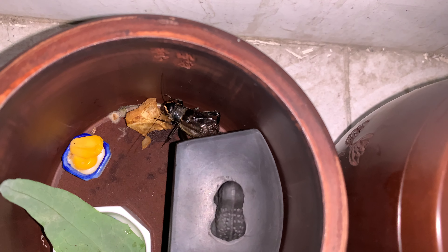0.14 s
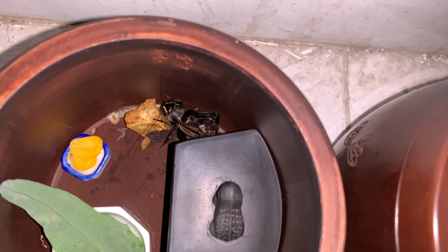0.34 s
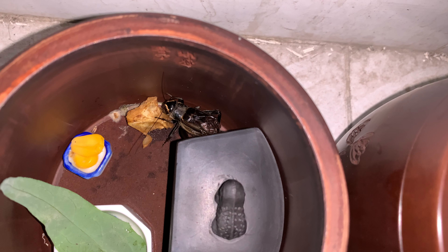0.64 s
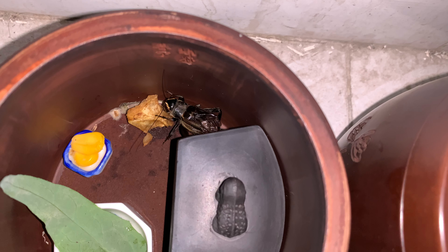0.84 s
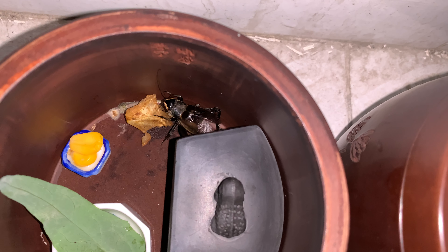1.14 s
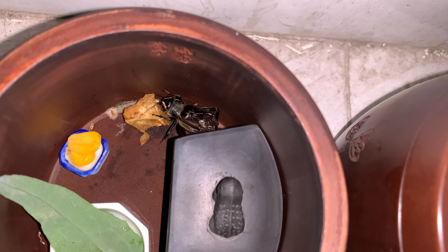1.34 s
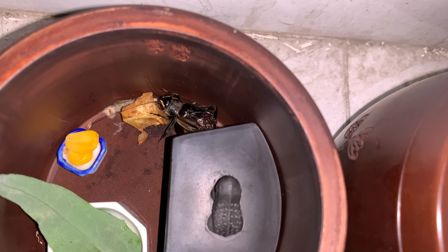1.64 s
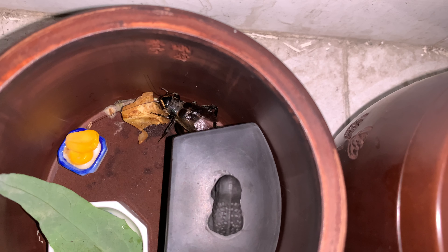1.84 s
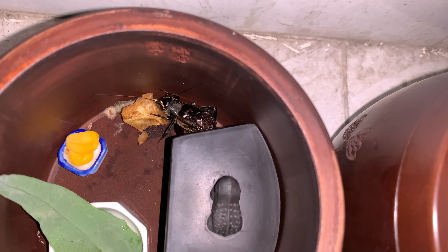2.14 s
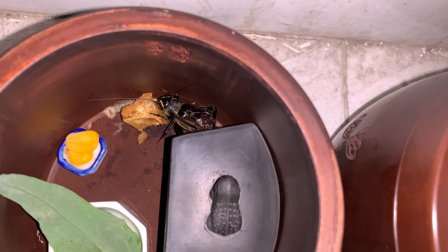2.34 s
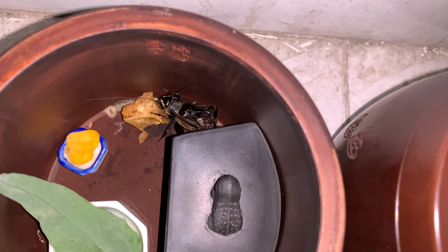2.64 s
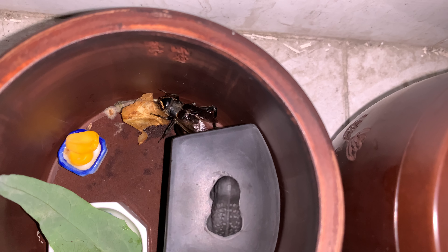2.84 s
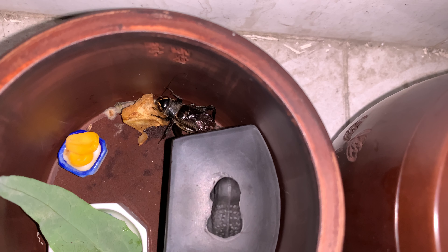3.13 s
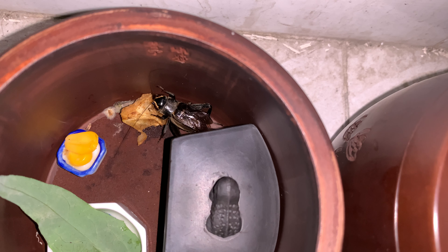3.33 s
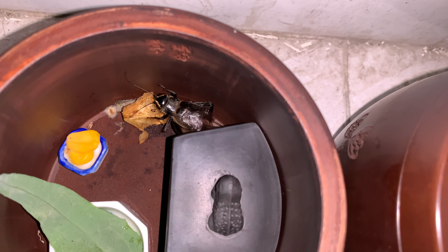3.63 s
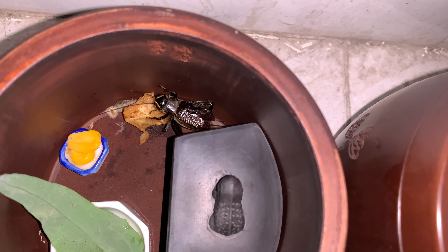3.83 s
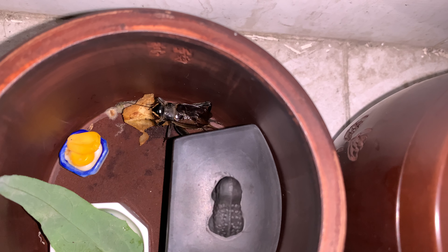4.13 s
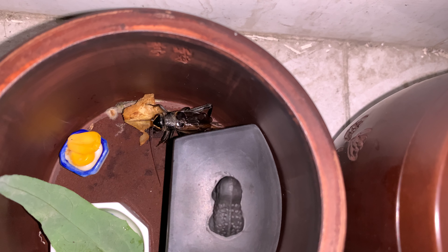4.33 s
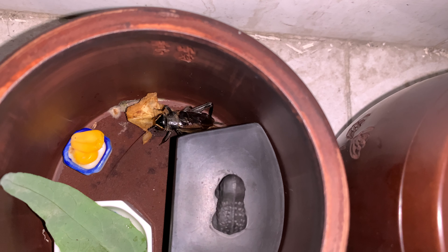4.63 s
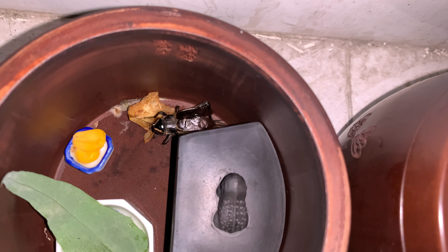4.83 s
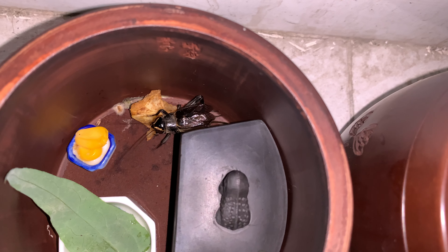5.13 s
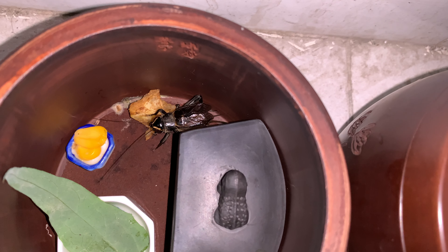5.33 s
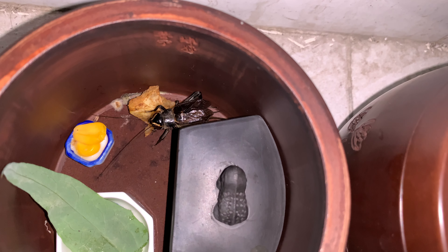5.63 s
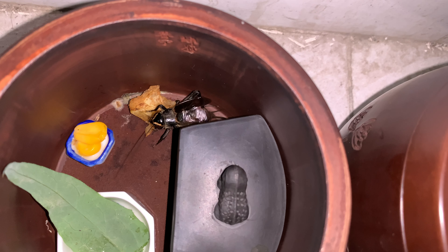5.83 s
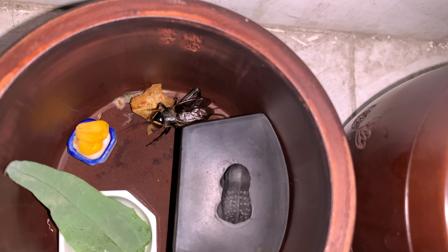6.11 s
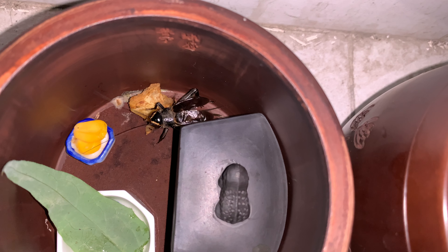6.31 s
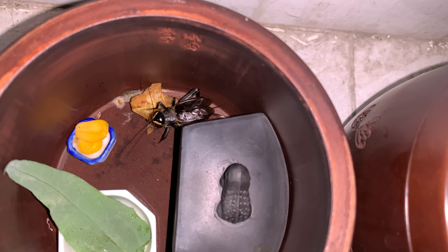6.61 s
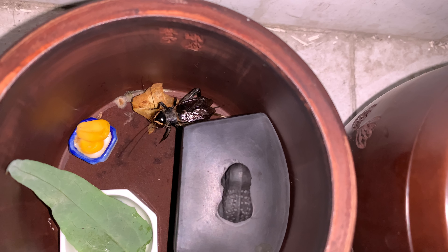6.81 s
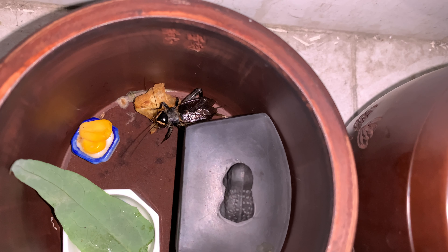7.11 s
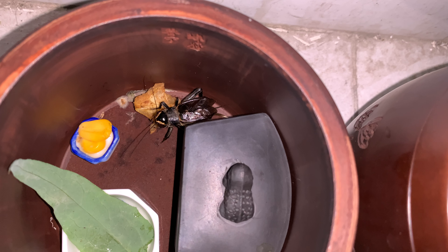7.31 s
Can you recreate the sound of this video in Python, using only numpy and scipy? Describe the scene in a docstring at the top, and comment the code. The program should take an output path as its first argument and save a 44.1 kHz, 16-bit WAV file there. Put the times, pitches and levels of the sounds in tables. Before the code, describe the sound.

A cricket sings close to the microphone inside a glazed pottery jar in a quiet tiled room. A somewhat softer five-stroke chirp begins almost at once, followed by faint fluttering double pulses from about 0.55 to 0.95 seconds. Loud, shrill chirps come at 1.1 and 1.9, each a fast run of grainy strokes gliding downward around 4 kHz and swelling at first. Another soft shivering bout runs from 2.2 to 2.5. Chirps return at 2.9 and 3.6; the latter is shorter, cut by a sharp scratch near 3.7. Quiet shivers follow from 3.9 to 4.3, then a relative pause. Loud chirps resume at 4.9, 5.8 and 6.4, with a small pulse near 6.1. Tiny foot scrapes are barely audible. The jar rings briefly, the room holds a bright tail, and low rumble, wavering hum and thin hiss remain to the end.

```python
"""In a quiet tiled room, a cricket sings inside a glazed pottery jar, close to the microphone.
Stridulation makes each loud chirp: in four to six wing strokes the file slows under the scraper,
so the tone glides down through the wing's resonance, with grainy friction noise around it.
Between the chirps the wings shiver in soft double pulses, snags scratch and feet scrape the clay.
The jar rings briefly and the room holds the shrill tone, over low rumble, a wavering hum and hiss."""
import sys
import numpy as np
from scipy import signal
from scipy.fft import rfft, irfft, next_fast_len
from scipy.io import wavfile
from scipy.ndimage import map_coordinates

SR = 44100
rng = np.random.default_rng(int(sys.argv[2]) if len(sys.argv) > 2 else 0)


def materialize(psi):
    """Save the field psi as 16-bit PCM at rate SR to the path in sys.argv[1].

    A 1-D psi becomes a single channel; in a 2-D psi each row is a channel.
    """
    bounded = np.clip(np.atleast_2d(psi).T, -1, 1)
    quanta = np.round(bounded * 32767).astype(np.int16)
    wavfile.write(sys.argv[1], SR, quanta)


N = 328986


def amp(db):
    """Logarithmic level: decibels become an amplitude ratio."""
    return 10 ** (np.asarray(db) / 20)


def unit(x):
    """Normalisation: the signal is scaled to an rms of 1."""
    return x / np.sqrt(np.mean(x ** 2) + 1e-20)


def along(points, hz):
    """Logarithmic frequency scale: (Hz, value) points are interpolated along it."""
    point_hz, values = np.transpose(points)
    return np.interp(np.log(hz + 1), np.log(point_hz + 1), values)


def columns(rows, at):
    """Linear interpolation: each column after the first is read at the given places."""
    place, *cols = np.transpose(rows)
    return [np.interp(at, place, col) for col in cols]


def wobble(rate, size):
    """Band-limited fluctuation: a smooth random curve with rate knots a second."""
    knots = rng.standard_normal(int(size * rate / SR) + 4)
    return map_coordinates(knots, [np.arange(size) * rate / SR])


def filtered(x, response):
    """Linear filtering: the spectrum is multiplied by a response of frequency."""
    m = next_fast_len(N + SR // 2)  # room for the filter to ring past the end
    hz = np.fft.rfftfreq(m, 1 / SR)
    return irfft(rfft(x, m) * response(hz), m)[..., :N]


def coloured(x, spectrum):
    """Spectral shaping: a (Hz, dB) curve leaves the power of white noise unchanged."""
    return filtered(x, lambda hz: unit(amp(along(spectrum, hz))))


def noise(spectrum, force=1):
    """Random excitation: friction or air noise of the given strength, coloured."""
    return coloured(force * rng.standard_normal(N), spectrum)


def add(track, s, sound):
    """Superposition: a sound is mixed into a track at s seconds."""
    part = track[max(0, round(s * SR)):][:len(sound)]
    part += sound[:len(part)]


# Wavering level of the hum. Each row: time in seconds, level in dB before a 2.5 dB cut.
HUM_LEVEL = [(0, -52.5), (1.2, -61.5), (2.4, -53), (2.95, -52.5), (3.15, -62.5), (5.0, -56), (5.7, -68.5),
             (7.4, -60)]


def hum():
    """Frequency modulation: a sine near 74 Hz drifts in pitch and follows a changing level."""
    t = np.arange(N) / SR
    hz = 74 + 1.2 * wobble(6, size=N)
    level = amp(columns(HUM_LEVEL, t)[0] - 2.5)
    return level * unit(np.sin(2 * np.pi * np.cumsum(hz) / SR))


# Colour of the rumble shared by both ports. Each row: frequency in Hz, relative density in dB per Hz.
AIR_SHARED = [(22, -30.5), (40, -13.5), (60, -1), (130, -1), (170, -8), (270, -10), (350, -16), (430, -15),
              (520, -24), (720, -21), (860, -28), (1280, -21), (1950, -27.5), (2600, -38.5), (4000, -69)]
# Colour of its unshared part. Each row: frequency in Hz, relative density in dB per Hz.
AIR_UNSHARED = [(35, -33.5), (70, -9), (260, -1.5), (450, -3), (700, -1), (930, -5.5), (1260, -6),
                (1900, -12.5), (2600, -17.5), (4500, -49.5)]
# Colour of the faint hiss. Each row: frequency in Hz, relative density in dB per Hz.
HISS_COLOUR = [(1500, -20.5), (2500, 1), (3800, -1.5), (4700, -14), (5400, -14.5), (7000, -14.5),
               (10000, -23.5), (16000, -26.5)]


def room_tone():
    """Partial coherence: shared and opposed noises make a wide rumble and hiss, with a central hum."""
    t = np.arange(N) / SR
    air = amp(-51.0 - 0.32 * t + 0.23 * wobble(3, size=N))  # the rumble eases slowly
    mid = air * noise(AIR_SHARED) + hum() + amp(-78.5) * noise(HISS_COLOUR)
    side = air * amp(-12.5) * noise(AIR_UNSHARED) + amp(-78) * noise(HISS_COLOUR)
    return np.array([mid + side, mid - side])


# Snags of the scraper on the file, as the wings are raised or in mid-stroke.
# Each row: start in seconds, level in dB, t60 in seconds.
SNAG_EVENTS = [(.040, -39, 0.036), (1.108, -39, 0.021), (1.218, -24, 0.038), (1.904, -37, 0.023),
               (2.002, -28, 0.037), (2.010, -30.5, .03), (2.897, -41.5, 0.056), (3.589, -34, .04),
               (3.728, -11.5, .02), (4.886, -49, 0.036), (4.901, -25, .028), (4.985, -24, 0.036),
               (4.993, -23, 0.034), (6.358, -44, 0.075)]
# Colour of a snag's scratch. Each row: frequency in Hz, relative density in dB per Hz.
SCRATCH_COLOUR = [(900, -39.5), (1900, -29), (2600, -37.5), (3700, -5.5), (4700, -1.5), (5600, -8.5),
                  (6400, 2), (7400, -12.5), (8500, -2.5), (9500, -7.5), (10400, 0.5), (11600, -2.5),
                  (12700, 0.5), (15500, -3.5)]
CATCH_S = .025  # t60 of the catch that opens a chirp


def snags():
    """Impulsive friction: skipped teeth make short, bright, crackly scratches; one opens each chirp."""
    force, t = np.zeros(N), np.arange(SR // 20) / SR
    catches = [(s, catch_db, CATCH_S) for s, *_, catch_db in CHIRP_EVENTS]
    for s, db, t60 in SNAG_EVENTS + catches:
        add(force, s, amp(db - 60 * t / t60))
    crackle = unit(amp(3.8 * wobble(2000, size=N)))
    return noise(SCRATCH_COLOUR, force * crackle)


def echoes(x, decay, colour, channels):
    """Exponential decay: in a diffuse tail each frequency has its own strength and dies at its own speed."""
    hz, t, z = signal.stft(rng.standard_normal((channels, SR)), SR, nperseg=256)
    fade = amp(-60 * t / along(decay, hz)[:, None]) * (t > 0)
    energy = np.sum(fade ** 2, axis=1, keepdims=True) * t[1] * SR
    fade *= amp(along(colour, hz))[:, None] / np.sqrt(energy)
    tail = signal.istft(z * fade, SR, nperseg=256)[1]
    return signal.fftconvolve(x[None], tail, axes=1)[:, :N]


# Decay of the jar. Each row: frequency in Hz, t60 in seconds.
JAR_DECAY = [(1900, .22), (4300, .06), (6400, 0.093), (10000, 0.037), (15000, .1)]
# Strength of the jar's ring. Each row: frequency in Hz, level in dB.
JAR_STRENGTH = [(1900, 6), (2600, -12), (3600, -12), (4300, -21), (5100, -7), (6400, -6), (8300, -22),
                (10400, -8), (12600, -26), (14000, -9)]


def jar_ring(cricket):
    """Cavity reverberation: the glazed jar answers with a brief diffuse ring."""
    return echoes(cricket, JAR_DECAY, JAR_STRENGTH, channels=1)[0]


# The jar's standing waves turn the phase between the two ports.
# Each row: frequency in Hz, lead of the left port in radians.
PORT_PHASE = [(100, -1.5), (3000, 1.75), (4000, 2), (4400, 2.5), (5340, 4), (6120, 6.5), (7410, 7),
              (7920, 8), (9650, 10), (10300, 11.5), (12700, 15), (13800, 16.5), (14600, 18), (16400, 19.5)]


def two_ports(jar):
    """Interaural-style phase difference: half the lead goes to the left port, half the lag to the right."""
    sign = np.array([[1], [-1]])
    return filtered(jar, lambda hz: np.exp(.5j * along(PORT_PHASE, hz) * sign))


# Decay of the room. Each row: frequency in Hz, t60 in seconds.
ROOM_DECAY = [(1000, 0.97), (4300, 0.64), (6500, 0.12), (13000, .33)]
# Strength of the room's tail. Each row: frequency in Hz, level in dB.
ROOM_STRENGTH = [(3950, -25.5), (4300, -28.5), (5000, -29), (8000, -40), (13000, -42)]


def room_tail(jar):
    """Room reverberation: the tiled room prolongs the shrill tone in two independent tails."""
    return echoes(jar, ROOM_DECAY, ROOM_STRENGTH, channels=2)


# How the wings radiate a tone and its overtones. Each row: frequency in Hz, relative gain in dB.
WING_RESPONSE = [(3800, -15), (3990, -8), (4090, -8.5), (4270, -2.2), (4340, 0), (4450, -6), (4700, -12),
                 (7700, -36), (8250, -24), (8900, -35), (11800, -36), (12450, -16), (12850, -14),
                 (13400, -32)]


def wing_tone(pitch, pressure_db, levels_db, steepness, jitter, flutter_db):
    """Resonance: one tooth strike a cycle; partials grow with pressure and swell near a wing resonance."""
    size = len(pitch)
    pitch = pitch * (1 + jitter * wobble(700, size=size))
    phase = 2 * np.pi * (np.cumsum(pitch) / SR + rng.random())
    tone = np.zeros(size)
    for k, (db, steep) in enumerate(zip(levels_db, steepness), 1):
        resonance_db = along(WING_RESPONSE, k * pitch)
        swell = amp(steep * pressure_db + resonance_db + flutter_db * wobble(380, size=size))
        tone += amp(db) * unit(swell * np.sin(k * phase))
    return tone * signal.windows.tukey(size, .1)


# Loud chirps. Each row: start in seconds, number of strokes, first period in seconds, first stroke's
# length in seconds, full stroke's length in seconds, full level in dB before tiring and scatter,
# rise to it in dB, strokes taken to warm up, top pitch of a full stroke in Hz, opening catch in dB.
CHIRP_EVENTS = [(0.054, 5, 0.033, 0.025, 0.033, -20.5, 5.5, 2.2, 4415, -40.5),
                (1.124, 6, .046, .0245, 0.038, -15.5, 11.5, 2.3, 4526, -47.5),
                (1.921, 5, .046, .0235, 0.039, -15.5, 12.5, 1.5, 4540, -46.5),
                (2.920, 5, .0469, .022, 0.041, -15.5, 10.5, 1.1, 4556, -31),
                (3.621, 4, .047, .0275, .036, -16.5, 7.5, 1.2, 4472, -42),
                (4.936, 5, .0486, .0265, .0375, -16, 7, 1, 4522, -25.5),
                (5.806, 5, .047, .0245, 0.039, -16, 9.5, 1, 4536, -34),
                (6.378, 5, .0432, .018, 0.039, -15, 10.5, 2.1, 4500, -32.5)]
# False starts, where the scraper meets only the slow end of the file.
# Each row: start in seconds, length in seconds, level in dB.
FALSE_STARTS = [(3.591, .015, -26.5), (4.901, .013, -35)]
# Share of a weak stroke's loss added to the second and third partials, in order, as plain ratios.
OVERTONE_SAG = [.3, .8]
SLOWING_S, TIRING_DB = .001, 0.5  # each stroke's period is longer and its level lower by this
GLIDE_HZ, SAG_HZ_PER_DB = 660, 11.5  # fall of pitch in a stroke; a weak stroke starts lower
SCATTER_DB, SCATTER_HZ = 0.5, 18  # from stroke to stroke
SHORTENING = 1.8  # a stroke reaches its full length sooner than its full strength
FALSE_START_HZ, FALSE_GLIDE_HZ, FALSE_OVERTONE_DB = 4020, 90, -14


def strokes():
    """Stridulatory rhythm: chirps warm up, slow and tire.

    Each row: start in s, length in s, level in dB, top Hz, glide Hz, overtone gains in dB.
    """
    rows = [(s, length, db, FALSE_START_HZ, FALSE_GLIDE_HZ, FALSE_OVERTONE_DB)
            for s, length, db in FALSE_STARTS]
    for (s, count, period, first_length, full_length,
         full_db, rise_db, warm_up, top_hz, _) in CHIRP_EVENTS:
        closed = s + first_length  # the closing of the wings keeps the beat
        for k in range(round(count)):
            slack = max(0, 1 - k / warm_up)
            length = full_length + slack ** SHORTENING * (first_length - full_length)
            weak_db = slack * rise_db
            db = full_db - weak_db - TIRING_DB * k + SCATTER_DB * rng.standard_normal()
            hz = top_hz - SAG_HZ_PER_DB * weak_db + SCATTER_HZ * rng.standard_normal()
            overtones_db = -weak_db * np.array(OVERTONE_SAG)
            rows.append((closed - length, length, db, hz, GLIDE_HZ, overtones_db))
            closed += period + SLOWING_S * k
    return rows


TICKS_PER_S, TICK_S = 130, 0.0017  # mean rate of single skipped teeth; their t60


def ticks():
    """Random impulses: sparse, sharp jolts of uneven size, where the scraper skips a single tooth."""
    jolts = (rng.random(N) < TICKS_PER_S / SR) * amp(4.4 * rng.standard_normal(N))
    decay = amp(-60 * np.arange(SR // 100) / SR / TICK_S)
    return signal.fftconvolve(jolts, decay)[:N]


# Pressure of the scraper along a loud stroke.
# Each row: share of the stroke from 0 to 1, relative tone level in dB, relative rasp level in dB.
STROKE_PRESSURE = [(0, -34, -7), (.05, -11, 3), (.13, -7, 6), (.3, -4, -4), (.55, 0, -3), (.65, 0, 3),
                   (.78, -2, -1), (.92, -3, -1), (1, -17, -8)]
# Once the scraper jumps off the file in mid-stroke and the tone breaks off.
# Each row: time in seconds, gain of the tone in dB.
SLIP_GAIN = [(3.707, 0), (3.727, 1.5), (3.730, -15.5), (3.742, -27.5), (3.750, -0.5)]
# Rasp of the file, coloured by the jar. Each row: frequency in Hz, relative density in dB per Hz.
RASP_COLOUR = [(1500, -42.5), (1900, -14.5), (2300, -39), (3150, -23), (3700, 3.5), (4900, -0.5),
               (5850, -10), (6350, 5), (7450, -13.5), (8400, -4.5), (9600, -10), (10200, -4.5), (14300, -4),
               (15400, -3)]
# Levels of the second and third partials, in order, in dB before each stroke's overtone gains.
OVERTONE_LEVELS = [-39.5, -31.5]
# Growth of the first three partials with pressure, in order, in dB per dB.
PARTIAL_STEEPNESS = [1, .7, 1]
GLIDE_BEND = 1.95  # exponent above 1: the pitch falls mostly late in the stroke
RASP_DB, RASP_SCATTER_DB, TICK_DB = -41.5, 2.2, -39.5  # friction of closing wings; ticks
SCUFF_DB, SCUFF_S = -7, .018  # friction of reopening wings, relative to that of closing; its length


def chirps():
    """Stick-slip stridulation: a falling tone with a grainy rasp, then a light scuff of reopening wings."""
    tone, friction = np.zeros(N), np.zeros(N)
    teeth = unit(amp(4.5 * wobble(300, size=N) + 3.5 * wobble(2500, size=N)))  # uneven: a grainy rasp
    scuff = np.hanning(round(SCUFF_S * SR))
    for s, length, db, top_hz, glide_hz, over_db in strokes():
        way = np.linspace(0, 1, round(length * SR))
        pitch = top_hz - glide_hz * way ** GLIDE_BEND  # the wing slows as it closes
        tone_db, rasp_db = columns(STROKE_PRESSURE, way)
        partials_db = [db, *np.add(OVERTONE_LEVELS, over_db)]
        stroke = wing_tone(pitch, tone_db, partials_db,
                           steepness=PARTIAL_STEEPNESS, jitter=0.0029, flutter_db=1.6)
        add(tone, s, stroke)
        add(friction, s, amp(rasp_db + rng.normal(0, RASP_SCATTER_DB)))
        add(friction, s + length, amp(SCUFF_DB + rng.normal(0, 2.8)) * scuff)
    grip_db, = columns(SLIP_GAIN, np.arange(N) / SR)
    # the tone keeps nothing below about 3.4 kHz
    radiated = filtered(amp(grip_db) * tone, lambda hz: 1 - 1 / (1 + (hz / 3350) ** 24))
    rasp = noise(RASP_COLOUR, amp(RASP_DB) * friction * teeth)
    skipped_teeth = noise(SCRATCH_COLOUR, amp(TICK_DB) * friction * ticks())
    return radiated + rasp + skipped_teeth


# Bouts of soft wing shivers. Each row: start in seconds, number of shivers, first tone in dB before
# the partials' offsets, first scrape in dB before the pressure's share, period in seconds.
SHIVER_BOUTS = [(.557, 1, -68.5, -59, .06), (.631, 5, -57.5, -59, .0604), (1.767, 1, -67.5, -58.5, .06),
                (2.188, 5, -58.5, -63, .06), (3.865, 1, -68, -61.5, .06), (3.953, 5, -57, -60.5, .0618),
                (5.757, 1, -68, -59.5, .06), (6.070, 1, -52.5, -66.5, .06)]
# One shiver, two small slides of the file.
# Each row: time in seconds, pitch in Hz, relative pressure in dB.
SHIVER_COURSE = [(0, 4380, -22.5), (.005, 4335, -3.5), (.009, 4270, -12), (.013, 4273, -18),
                 (.017, 4335, -1.5), (.023, 4347, 0), (.028, 4290, -14), (.035, 4140, -14),
                 (.042, 4096, -31.5)]
# Light scrape of the shivering wings. Each row: frequency in Hz, relative density in dB per Hz.
SCRAPE_COLOUR = [(3600, -30.5), (4250, -2), (4900, -22), (5950, -23), (6300, 2.5), (6680, -24.5),
                 (7850, -27.5), (8300, 0.5), (9000, -28), (10200, -21), (11800, -24), (12400, -21.5),
                 (14300, -23), (15800, -25.5)]
SETTLED_TONE_DB, SETTLED_SCRAPE_DB = -48.5, -68  # after a bout's first shiver, before the same offsets


def shivers():
    """Light-contact stridulation: soft double pulses, about sixteen a second, each bout opening scrapier."""
    tone, friction = np.zeros(N), np.zeros(N)
    t = np.arange(round(SHIVER_COURSE[-1][0] * SR)) / SR
    pitch, pressure_db = columns(SHIVER_COURSE, t)
    for start, count, first_db, first_scrape_db, period in SHIVER_BOUTS:
        for k in range(round(count)):
            s = start + k * period
            db, scrape_db = (SETTLED_TONE_DB, SETTLED_SCRAPE_DB) if k else (first_db, first_scrape_db)
            pulse = wing_tone(pitch, pressure_db, [db + .7, db - 16, db - 11.0],
                              steepness=[.8, .25, 2.2], jitter=.003, flutter_db=1.4)
            add(tone, s, pulse)
            add(friction, s, amp(scrape_db + 0.57 * pressure_db + 3.5))
    grain = unit(amp(4.2 * wobble(250, size=N)))
    return tone + noise(SCRAPE_COLOUR, friction * grain)


# The cricket's feet scratch faintly on the clay. Each row: start in seconds, level in dB, t60 in seconds.
STEP_EVENTS = [(1.695, -73.5, 0.093), (3.235, -71.5, 0.04), (6.208, -76, .04), (6.85, -78, 0.092)]
# Colour of those scratches. Each row: frequency in Hz, relative density in dB per Hz.
CLAY_COLOUR = [(3500, -20), (5200, -6), (6400, 0), (7600, -6), (9500, -16), (15000, -16)]


def steps():
    """Decaying friction: claws on clay make faint, quickly fading scratches."""
    force, t = np.zeros(N), np.arange(SR // 10) / SR
    for s, db, t60 in STEP_EVENTS:
        add(force, s, amp(db - 60 * t / t60))
    grain = unit(amp(4 * wobble(400, size=N)))
    return noise(CLAY_COLOUR, force * grain)


def scene():
    """Superposition: the cricket in its jar, heard at two ports, with the room behind."""
    cricket = chirps() + snags() + shivers() + steps()
    jar = cricket + jar_ring(cricket)
    return two_ports(jar) + room_tail(jar) + room_tone()


TOP_HZ = 15950  # band limit


def record(dry):
    """Band limitation: a very steep low-pass keeps almost nothing above the limit."""
    return filtered(dry, lambda hz: 1 / (1 + (hz / TOP_HZ) ** 140))


dry = scene()
out = record(dry)
materialize(out)
```